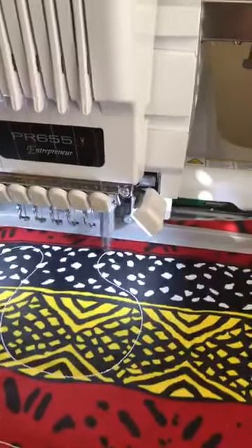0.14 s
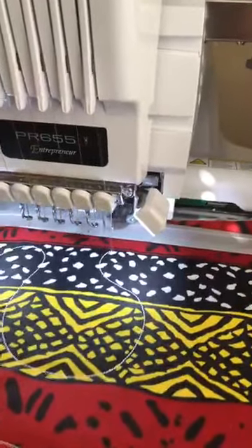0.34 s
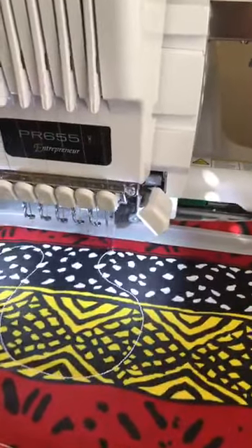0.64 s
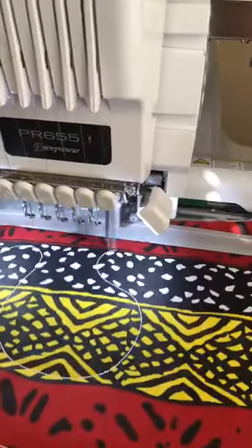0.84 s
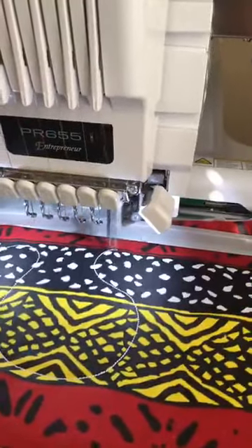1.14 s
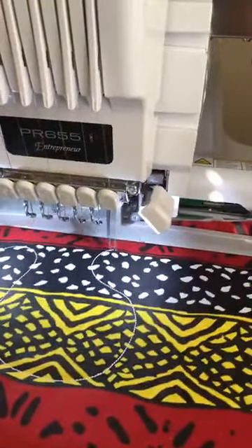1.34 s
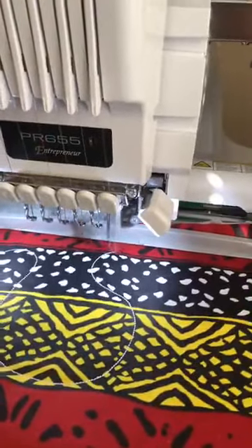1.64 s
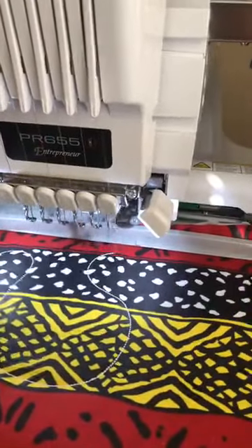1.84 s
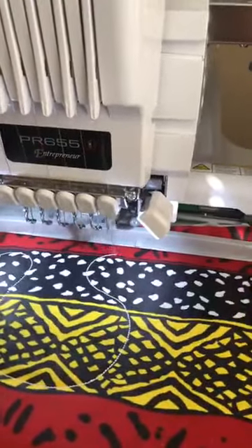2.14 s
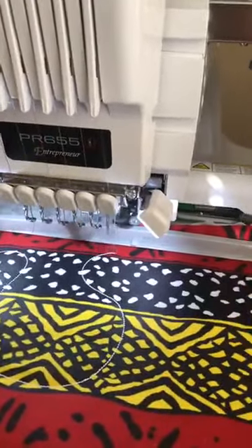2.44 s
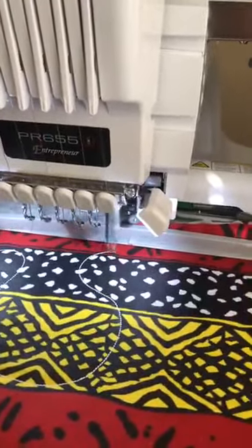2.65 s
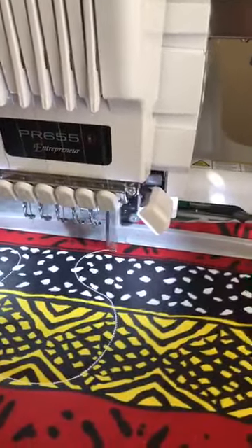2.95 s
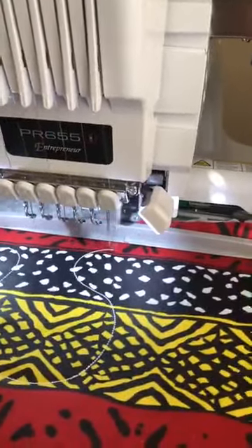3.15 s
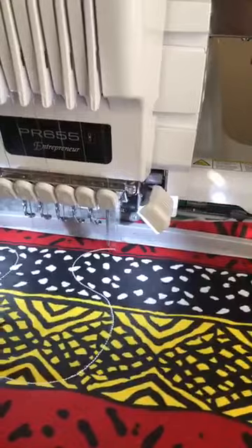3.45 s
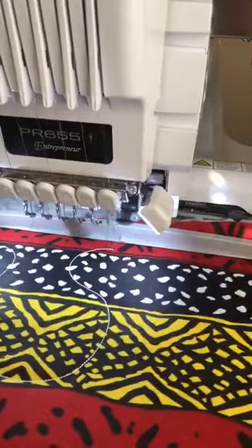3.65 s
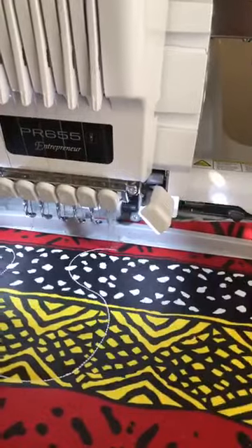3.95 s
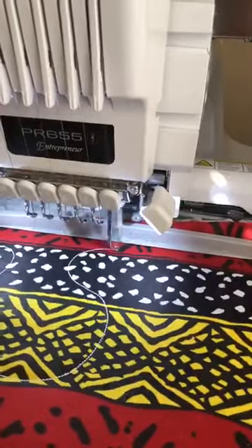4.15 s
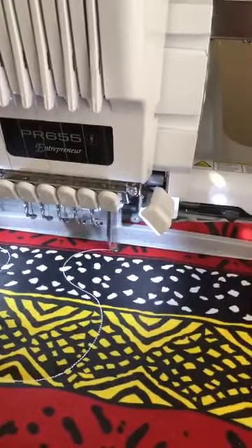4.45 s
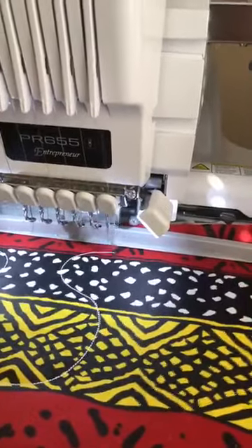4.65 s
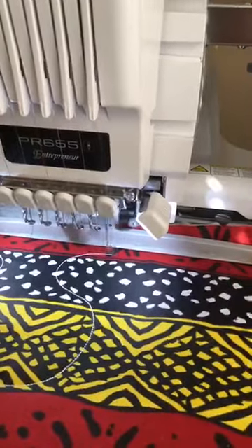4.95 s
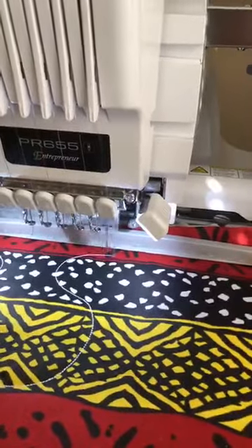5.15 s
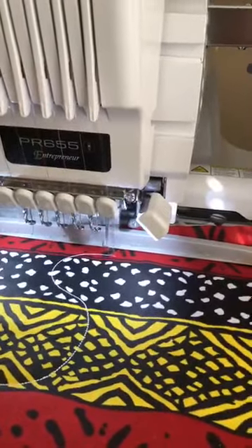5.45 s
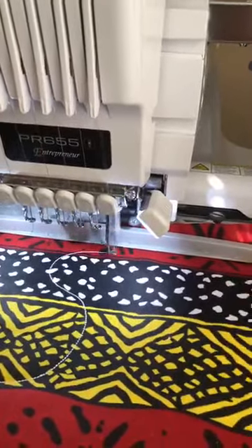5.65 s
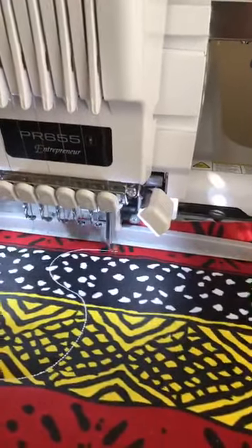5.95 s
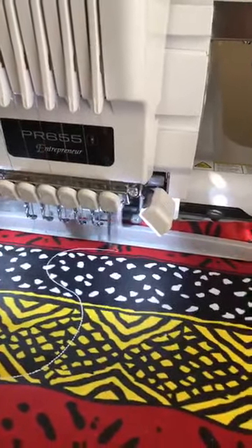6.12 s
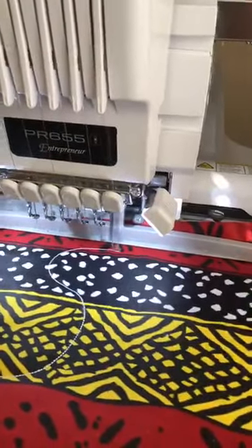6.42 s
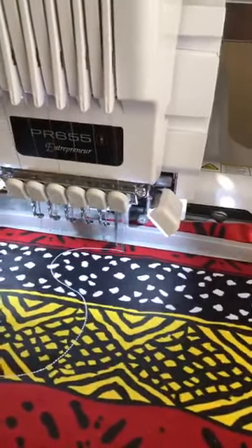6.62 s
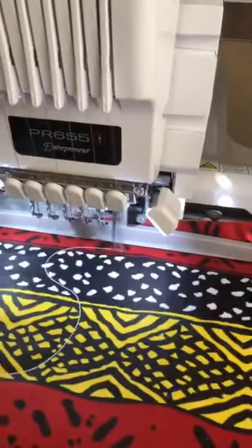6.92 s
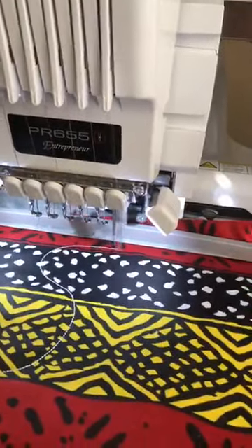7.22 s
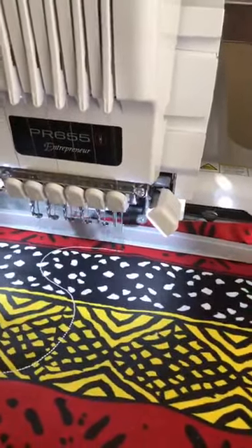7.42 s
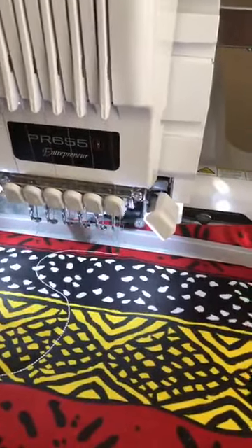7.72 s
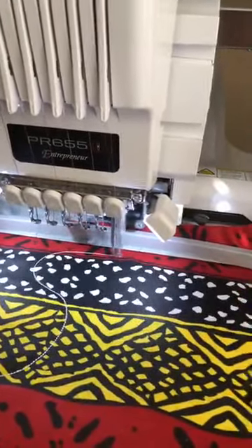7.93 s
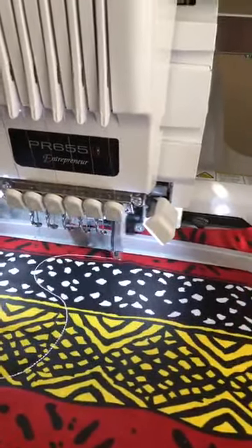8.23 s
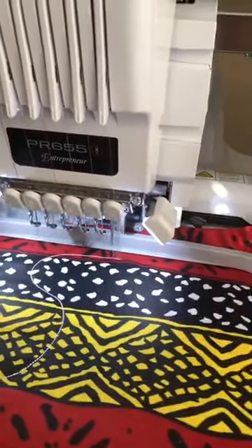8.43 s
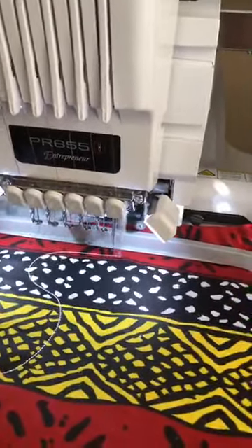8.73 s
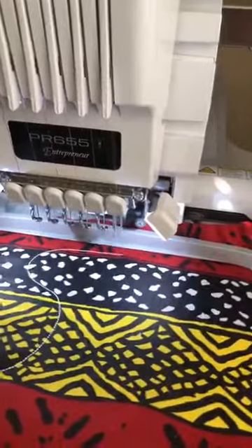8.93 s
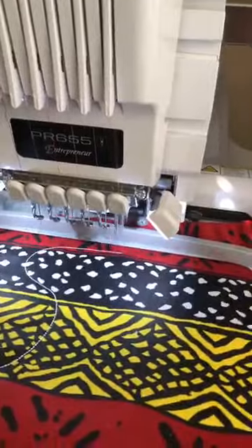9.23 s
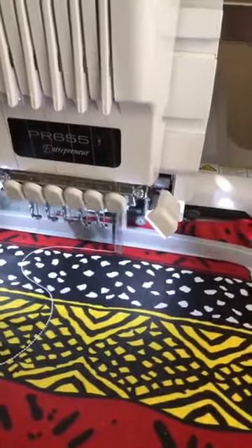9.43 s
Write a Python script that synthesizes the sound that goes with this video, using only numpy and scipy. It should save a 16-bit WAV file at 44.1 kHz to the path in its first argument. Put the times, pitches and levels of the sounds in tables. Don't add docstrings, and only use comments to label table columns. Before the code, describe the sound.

Steady machine embroidery, already running at the start and never stopping. Each rapid turn has a needle strike, a soft low thump, then a brighter hook clatter and thread hiss. Small snaps and ticks vary slightly from stroke to stroke. The sound is near and dry with a short small-room echo; metallic singing increases gradually while the pace stays constant.

```python
import sys
import numpy as np
from scipy import signal
from scipy.fft import rfft, irfft, next_fast_len
from scipy.io import wavfile
from scipy.ndimage import uniform_filter1d

SR = 44100
rng = np.random.default_rng(int(sys.argv[2]) if len(sys.argv) > 2 else 0)


def store_pcm(level_fs):
    pcm = np.round(np.clip(level_fs, -1, 1) * 32767).astype(np.int16)
    wavfile.write(sys.argv[1], SR, np.atleast_2d(pcm).T)


def invert_db(x):
    u = np.asarray(x, float) / 20
    return 10 ** u


N = 422478

STITCH_PER_S = 13.2978

# time into the turn in ms, peak in dB, swell in ms.
BAR_PUSHES = [(27.61, -21.5, 2.59), (36.9, -26, 2.67), (48.8, -30.5, 3.8), (59.3, -26.5, 3.15),
              (74.3, -25, 3.64), (87.3, -27.02, 1.5)]
BAR_HZ = 2027.85
BAR_START_DB, BAR_DB_PER_S = -2.5, .5

# time into the turn in ms, pitch in Hz, peak in dB, swell in ms.
HOOK_CONTACTS = [(60.05, 2305.63, -31, 1.95), (63.35, 2360, -31, 1.26), (65.7, 2666.87, -28, 4.8),
                 (68.16, 2502.06, -23.5, 3.94), (75.15, 2497.89, -30, 3), (82.34, 2501.23, -25, 1.7),
                 (87.11, 2481.16, -25, 2.2), (88.24, 2628.62, -29.5, 1.6), (5.987, 1967.71, -32, 4.2),
                 (11.385, 2110.23, -30, 4.1), (27.51, 2204.2, -27.33, 0.62), (65.8, 2230, -31, 1.15),
                 (20.01, 2082.04, -36.94, 4.6), (45.46, 2037.33, -31.87, 1.9)]
HOOK_START_DB, HOOK_END_DB, HOOK_SETTLE_S = 2, -0.24, 3.4

# pitch in Hz, swell in ms, peak in dB, first knock in ms, second knock in ms.
HOUSING_PARTS = [(264, 6.1, -35.62, 36.88, 12.46), (265, 3.95, -35.72, 61.1, 13.6),
                 (356, 3, -34, 17.63, 7.26), (364.5, 11.51, -38, 70.78, 38.73),
                 (485.17, 4.87, -35, 52.31, 21.52), (557, 14.7, -34, 8.916, 63.84),
                 (622, 20.2, -34.5, 9.126, 64.25), (791.23, 2, -29, 16.07, 27.56),
                 (1190, 0.96, -27.5, 13.89, 1.19), (1276, 0.55, -23, 7.5, 25.93),
                 (1539, 2.45, -29, 5.42, 18.54), (1570, 1.39, -31, 33.79, 13.99),
                 (1880, 3, -30.5, 28.5, 63.49), (915, 3.49, -41, 37.32, 11.41)]
SECOND_KNOCK_DB = -4
LEG_ACCENT_DB = (.6, -.4, -.2)

# time into the turn in ms, pitch in
# Hz, peak in dB, swell in ms.
SNAPS = [
    (75.6, 3310, -33, 1.3),
    (10.03, 3700, -38.5, 2.1),
    (75, 6650, -28.5, 0.25),
    (41.9, 3900, -36.5, 1.5),
]

# level in dB, then delay in ms.
LEG_DB = (-28.3, -31.4, -32.0)
LEG_DELAY_MS = (-3.9, -.8, -2.0)
THUMP_HZ, THUMP_AT_MS, THUMP_WIDTH_MS = 142, 32.8, 13
JOLT_HZ, JOLT_WIDTH_MS, JOLT_DB = 90, 10, -21
BEND_AT_S, BEND_S, BEND_SHIFT_DB = .8, .55, 2.8
FIRMING_FROM_S, FIRMING_DB_PER_S = 7.5, 1.3

# time in ms, level in dB, decay in ms, spread between turns in dB.
TICKS = [(.1, -30, 1.2, 2.4), (3.5, -36, 1.3, 5), (13, -34, 1.6, 3), (27.6, -29, 1.3, 2.4),
         (39, -34, 4.7, 4), (61.3, -30, 3.8, 3), (74, -32, .9, 1)]

STRIKE_MS, STRIKE_RISE_MS, STRIKE_DB, EASED_DB = 13.4, 6, 2.0, -3.0
CATCH_MS, CATCH_RISE_MS, HOLD_MS, SLACKEN_MS, TIGHT_DB, SLACK_DB = 60, 13.6, 19.7, 38, 1.86, -4.0
RUB_DB = -30.5
# frequency in Hz, level in dB per Hz.
HOUSING_RUB = [(40, -23), (60, -23), (100, -11), (260, -3.5), (410, -10), (560, -4.5), (1700, -5),
               (3000, -12)]
# frequency in Hz, level in dB per Hz.
HOOK_RUB = [(3000, -11.5), (6000, -13), (10000, -18.5), (12500, -25.5), (15500, -20.5)]
# frequency in Hz, share of power from 0 to 1.
REPEAT = [(100, 0.26), (250, 0.12), (2600, .12), (4000, 0.34), (7000, 0.14), (11000, .01)]
# frequency in Hz, width in Hz, level in dB.
PANELS = [(264, 56, -48), (354, 64, -47.5), (521, 48, -47.5), (609, 51, -42.5), (767, 49, -45.5),
          (902, 50, -47), (1253, 160, -42), (1840, 150, -45.5), (2034, 68, -44.5), (2485, 80, -49.5),
          (3510, 400, -45)]
# frequency in Hz, width in Hz.
TABLE_DIPS = [(209, 20), (1010, 100), (1410, 64), (2240, 89)]

ROOM_T60_S, ROOM_DB = 0.28, -15.5
CUTOFF_HZ = 15750


def rms_one(x):
    return x / np.sqrt(np.mean(x ** 2) + 1e-20)


def turns():
    return np.arange(-3, int(N / SR * STITCH_PER_S) + 1) / STITCH_PER_S


def add(out, starts_s, shapes):
    for at, shape in zip(np.round(starts_s * SR).astype(int), shapes):
        low, high = max(at, 0), min(at + len(shape), N)
        if high > low:
            out[low:high] += shape[low - at:high - at]


def contacts(rows, gain_db, in_step=False, spread_db=1.4, shared_db=0.5, slip_us=12, shaft_us=14, creep_db=0.42):
    out, start = np.zeros(N), turns()
    force, shaft = np.clip(rng.standard_normal((len(start), 2)), -2, 2).T
    for at_ms, hz, peak_db, swell_ms in rows:
        t = np.arange(int(9 * swell_ms / 1000 * SR)) / SR
        swells = t / swell_ms * 1000
        ring = swells * np.exp(1 - swells + 2j * np.pi * hz * t)
        chance = np.clip(rng.standard_normal((len(start), 3)), -2, 2)
        creep = rms_one(uniform_filter1d(chance[:, 2], size=25))
        at_s = start + at_ms / 1000
        rounding_s = at_s - np.round(at_s * SR) / SR
        late_s = (slip_us * chance[:, 1] + shaft_us * shaft) / 1e6 + rounding_s
        late_s = late_s - in_step * at_ms / 1000
        level_db = peak_db + gain_db + spread_db * chance[:, 0] + shared_db * force + creep_db * creep
        gain = invert_db(level_db) * np.exp(-2j * np.pi * hz * late_s)
        add(out, at_s, np.imag(np.outer(gain, ring)))
    return out


def needle_bar():
    pushes = [(at_ms, BAR_HZ, peak_db, swell_ms) for at_ms, peak_db, swell_ms in BAR_PUSHES]
    gain_db = BAR_START_DB + BAR_DB_PER_S * turns()
    return contacts(pushes, gain_db, in_step=True, spread_db=1.0, shared_db=.5, slip_us=20)


def rotary_hook():
    gain_db = HOOK_END_DB + (HOOK_START_DB - HOOK_END_DB) * np.exp(-turns() / HOOK_SETTLE_S)
    return contacts(HOOK_CONTACTS, gain_db, spread_db=1.5, shared_db=0.6, slip_us=19)


def housing_knocks():
    knocks = []
    for hz, swell_ms, peak_db, first_ms, second_ms in HOUSING_PARTS:
        knocks.append((first_ms, hz, peak_db, swell_ms))
        knocks.append((second_ms, hz, peak_db + SECOND_KNOCK_DB, swell_ms))
    return contacts(knocks, np.resize(LEG_ACCENT_DB, len(turns())), spread_db=1.5, shared_db=.9)


def snaps():
    return contacts(SNAPS, 0, spread_db=2.5)


def carriage(spread_db=.8, slip_ms=.35):
    out, start = np.zeros(N), turns()
    bend_db = BEND_SHIFT_DB * np.exp(-((start - BEND_AT_S) / BEND_S) ** 2)
    firm_db = FIRMING_DB_PER_S * np.maximum(start - FIRMING_FROM_S, 0)
    leg = np.arange(len(start)) % 3
    level_db = np.array(LEG_DB)[leg] + np.choose(leg, [0, firm_db - bend_db, firm_db + bend_db])
    chance = rng.standard_normal((len(start), 2))
    late_s = (np.array(LEG_DELAY_MS)[leg] + slip_ms * chance[:, 1]) / 1000
    t = np.arange(-.045, .045, 1 / SR)
    thump = np.exp(-.5 * (1000 * t / THUMP_WIDTH_MS) ** 2 + 2j * np.pi * THUMP_HZ * t)
    jolt = np.exp(-.5 * (1000 * t / JOLT_WIDTH_MS) ** 2 + 2j * np.pi * JOLT_HZ * t)
    swing = thump + invert_db(JOLT_DB) * jolt
    gain = invert_db(level_db + spread_db * chance[:, 0]) * np.exp(-2j * np.pi * THUMP_HZ * late_s)
    add(out, start + THUMP_AT_MS / 1000 + t[0], np.real(np.outer(gain, swing)))
    return out


def ticks(low_hz=2600, high_hz=9000):
    out, start = np.zeros(N), turns()
    for at_ms, level_db, decay_ms, spread_db in TICKS:
        t_ms = np.arange(int(6 * decay_ms / 1000 * SR)) / SR * 1000
        shape = np.exp(-t_ms / decay_ms) * (1 - np.exp(-t_ms / .15))
        gain = invert_db(level_db + spread_db * rng.standard_normal(len(start)))
        add(out, start + at_ms / 1000, np.outer(gain, shape))
    bright = signal.butter(2, low_hz, "high", fs=SR, output="sos")
    soft = signal.butter(1, high_hz, fs=SR, output="sos")
    return signal.sosfilt(np.vstack([bright, soft]), out * rng.standard_normal(N))


def at_hz(points, hz):
    points_hz, values = np.array(points).T
    return np.interp(np.log(hz), np.log(points_hz), values)


def drift(rate):
    r = np.exp(-80 * np.pi * rate / SR)
    slow = signal.lfilter([1], [1, -2 * r, r * r], rng.standard_normal(N // 40 + 2002))[2000:]
    return np.interp(np.arange(N) / 40, np.arange(len(slow)), rms_one(slow))


def resonance(x, hz, width_hz):
    r = np.exp(-np.pi * width_hz / SR)
    poles = [1, -2 * r * np.cos(2 * np.pi * hz / SR), r * r]
    return signal.lfilter([(1 - r * r) / 2, 0, (r * r - 1) / 2], poles, x)


def load(start_ms, rise_ms, hold_ms, fall_ms, low_db, high_db):
    since_ms = (np.arange(N) / SR * 1000 - start_ms) % (1000 / STITCH_PER_S)
    corners_ms = np.cumsum([0, rise_ms, hold_ms, fall_ms])
    return invert_db(np.interp(since_ms, corners_ms, [low_db, high_db, high_db, low_db]))


def rubbing(grain_db=1.85, patchy_db=0.85, split_hz=2800):
    turn = np.arange(N) / SR * STITCH_PER_S % 1
    housing = load(STRIKE_MS - STRIKE_RISE_MS, STRIKE_RISE_MS, 2.8, 44, EASED_DB, STRIKE_DB)
    hook = load(CATCH_MS, CATCH_RISE_MS, HOLD_MS, SLACKEN_MS, SLACK_DB, TIGHT_DB)
    fresh = rng.standard_normal((2, N))
    place = np.round(turn * SR / STITCH_PER_S).astype(int) % 3317
    looped = rng.standard_normal((2, 3317))[:, place]
    grain = invert_db(grain_db * drift(145))
    out, edges = 0, 40 * 2 ** (np.arange(27) / 3)
    for k, (low, high) in enumerate(zip(edges, edges[1:])):
        hz = np.sqrt(low * high)
        share = np.clip(at_hz(REPEAT, hz), 0, 1)
        source = np.sqrt(share) * looped[k % 2] + np.sqrt(1 - share) * fresh[k % 2]
        pressed, colour = (housing, HOUSING_RUB) if hz < split_hz else (hook * grain, HOOK_RUB)
        third_octave = signal.butter(2, [low, high], "band", fs=SR, output="sos")
        band = signal.sosfilt(third_octave, source * pressed)
        out = out + invert_db(at_hz(colour, hz) + patchy_db * drift(13.6)) * band
    shake = rng.standard_normal(N) * housing
    panels = sum(invert_db(db) * rms_one(resonance(shake, hz, width_hz)) for hz, width_hz, db in PANELS)
    heard = invert_db(RUB_DB) * rms_one(out) + panels
    for hz, width_hz in TABLE_DIPS:
        heard = heard - 0.7 * resonance(heard, hz, width_hz)
    return heard


def room(x, wall_hz=5000):
    size = next_fast_len(N + SR)
    hz = np.arange(size // 2 + 1) * SR / size
    echo = 0
    for lag_s in rng.uniform(.012, .035, 8):
        wall = invert_db(-60 * lag_s / ROOM_T60_S) / (1 + 1j * hz / wall_hz)
        loop = wall * np.exp(-2j * np.pi * hz * lag_s)
        echo = echo + loop / (1 - loop)
    return irfft(rfft(x, size) * echo, size)[:N]


def scene():
    bright = ticks()
    ringing = needle_bar() + rotary_hook() + housing_knocks() + snaps()
    machine = ringing + carriage() + rubbing() + bright
    return (machine + invert_db(ROOM_DB) * room(bright))[None]


def band_limit(x):
    return signal.sosfilt(signal.butter(12, 16800, fs=SR, output="sos"), x)


def record(dry):
    top_cut = signal.ellip(12, .5, 70, CUTOFF_HZ, fs=SR, output="sos")
    mix = signal.sosfilt(top_cut, dry)
    return band_limit(mix)


dry = scene()
out = record(dry)
store_pcm(out)
```